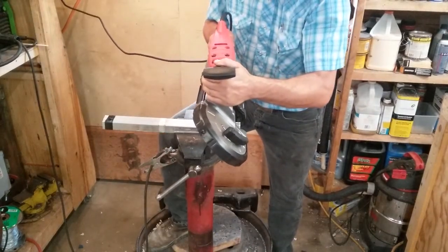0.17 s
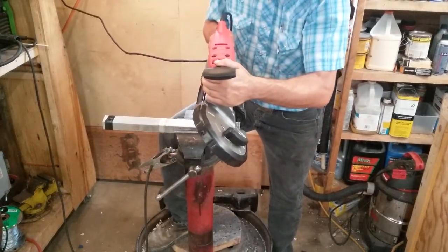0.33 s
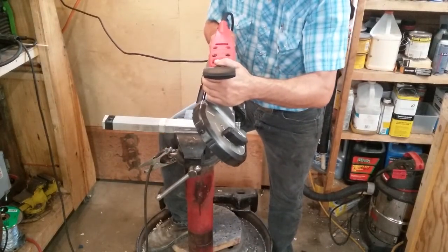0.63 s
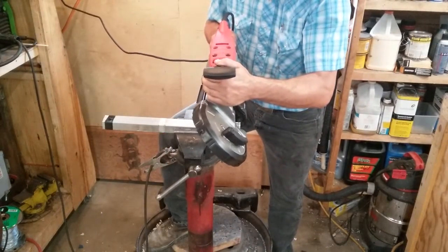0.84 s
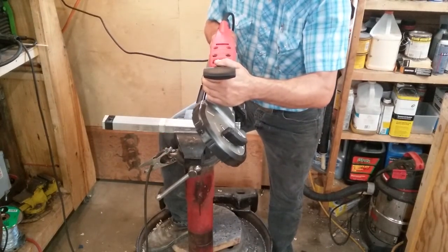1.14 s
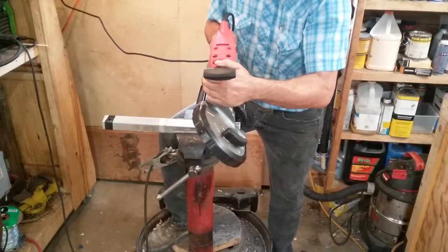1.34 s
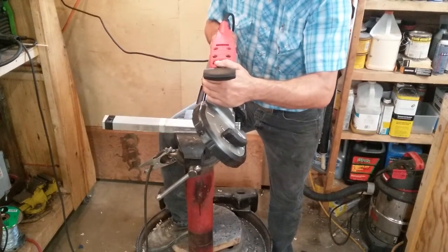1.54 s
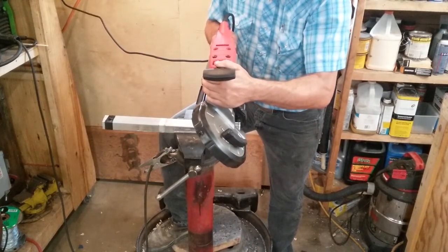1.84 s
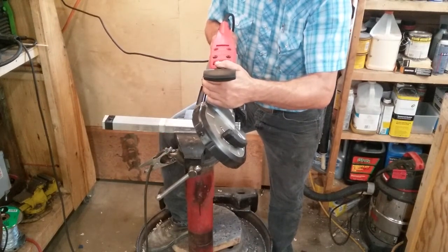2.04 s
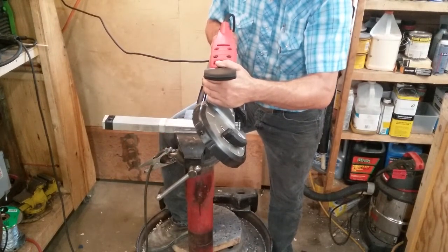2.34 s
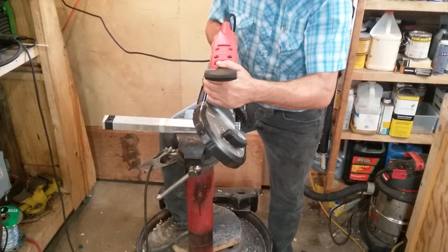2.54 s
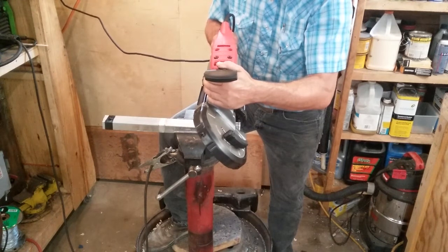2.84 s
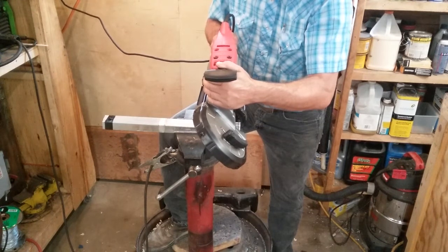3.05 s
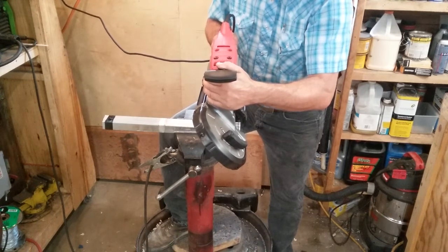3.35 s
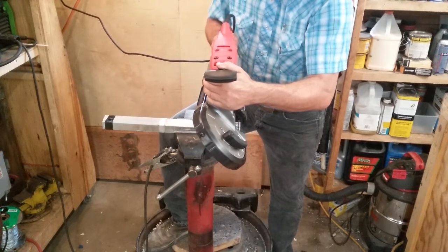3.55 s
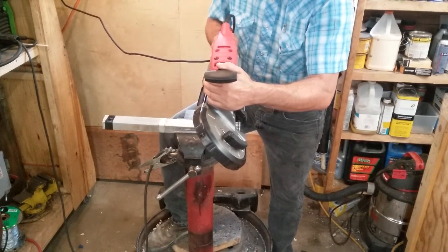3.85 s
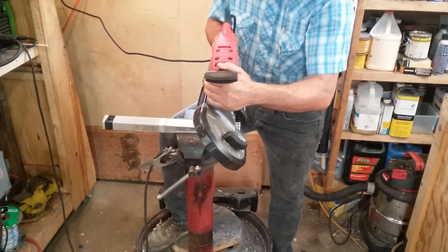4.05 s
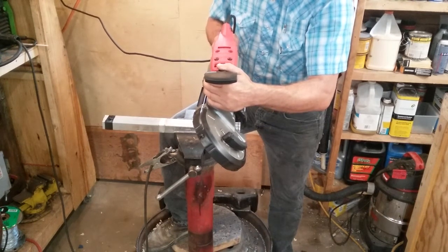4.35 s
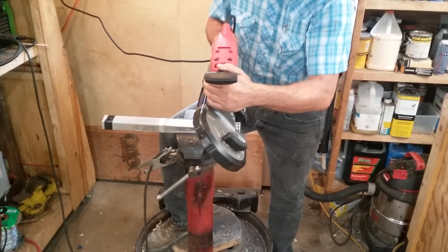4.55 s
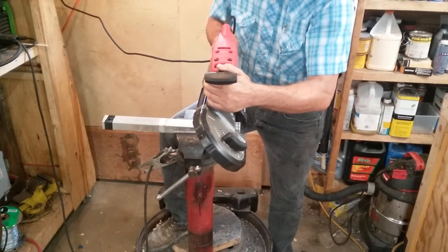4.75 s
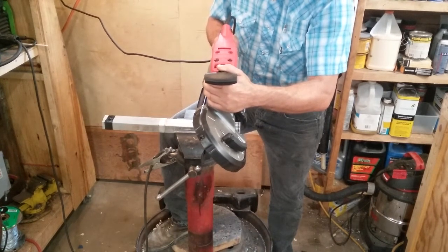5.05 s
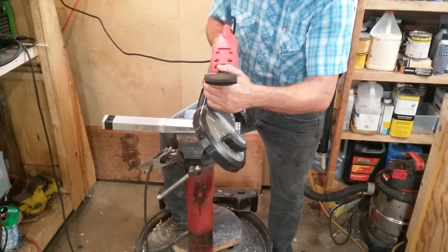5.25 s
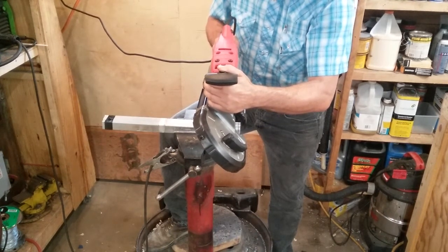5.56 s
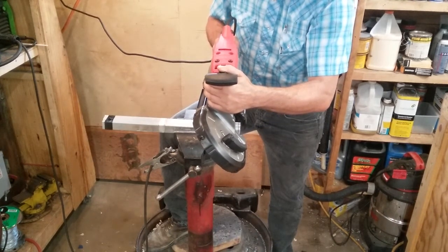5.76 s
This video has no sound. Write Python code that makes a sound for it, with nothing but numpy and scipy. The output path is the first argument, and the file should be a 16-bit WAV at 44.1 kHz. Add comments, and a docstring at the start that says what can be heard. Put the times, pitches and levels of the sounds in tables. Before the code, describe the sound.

An electric bandsaw whines and clatters freely, then slows as its blade screeches through sheet metal in a small shed.

```python
"""In a small wooden shed, a portable bandsaw runs free, then is pressed into a bundle of thin sheet metal.
At first its gears rattle over the whine of the motor and its fan. In the cut the motor slows and the
rattle dies down. The blade's teeth hammer out a rough, fluttering scream, and chips tear off with a
rasping hiss. A faint room rumble lies underneath."""
import sys
import numpy as np
from scipy import signal
from scipy.fft import rfft, irfft, next_fast_len
from scipy.io import wavfile
from scipy.ndimage import uniform_filter1d, minimum_filter1d

SR = 44100
rng = np.random.default_rng(int(sys.argv[2]) if len(sys.argv) > 2 else 0)


def unload_wav(signal):
    """Save mono or channel-first audio to the path in sys.argv[1] as 16-bit WAV at rate SR, clipped to [-1, 1]."""
    wavfile.write(
        sys.argv[1],
        SR,
        np.round(np.clip(np.atleast_2d(signal).T, -1, 1) * 32767).astype(np.int16),
    )


N = 259749
TIME = np.arange(N) / SR


def teeth(turns, sag, depth, screech_db):
    """Teeth hammer the sheets. Their spacing varies in a repeating pattern, which roughens the note."""
    # How hard the teeth bite. Each row: time in seconds, level in dB.
    bite = [(1.6, -22), (1.78, -22), (2.04, -13.5), (2.36, -16), (2.5, -13.5), (2.92, -18.5), (3.06, -25.5),
            (3.46, -15.5), (3.72, -24), (4.1, -19), (5.62, -18.5), (5.83, -17)]
    # Teeth snatch at a sheet's edge. Each row: middle in seconds, extra dB, half length in seconds.
    grabs = [(1.669, 8, 0.017), (1.744, 4, .01), (1.88, 3, .03), (2.0, 1, 0.0091), (2.22, 2.5, 0.011),
             (3.16, 4.5, .025), (3.275, 5, 0.012), (3.365, 6.5, 0.0074), (3.522, 2, 0.01), (3.61, 0, .009),
             (3.821, 7, 0.0085), (4.079, 6, 0.025), (4.359, 6.5, 0.012), (5.102, 4, 0.0079),
             (5.445, 3.5, 0.0057)]
    # Higher notes of the blows. Each row: multiple of the tooth rate, base level in dB,
    # extra dB per turn a second of sag, extra dB at full depth, share of a screech.
    overtones = [(2, -31.5, 0.155, 0.5, 1.3), (3, -32, 0.0846, 5, .45)]
    # How well the sheets give off sound. Each row: frequency in Hz, gain in dB.
    sheets = [(1800, 0), (2500, -10), (3080, 3), (3450, -4), (3850, 2.5), (4400, 9), (4700, -5.5),
              (5050, -1), (5400, -3.5)]
    teeth_per_turn, teeth_per_pattern = 5.283, 16
    passed = teeth_per_turn * turns
    spacing = (.11 - .04 * depth) * np.sin(2 * np.pi * passed / teeth_per_pattern)
    slip = .055 * drift(16)   # the blade stretches and slips by part of a tooth
    strikes = passed + spacing + slip
    flutter_hz = 22 + 4.1 * drift(2.92)   # deep in the cut, the blade flutters
    flutter_db = 4 * depth * np.sin(2 * np.pi * np.cumsum(flutter_hz) / SR)
    grab_db = swells(grabs)
    # Between grabs, the teeth lose their hold for moments.
    stutter_db = -7 * np.maximum(drift(38), 0) * np.exp(-np.abs(grab_db))
    blur = .22 * (1 - .75 * depth)   # the narrow cut guides the blade and cleans its note
    strength = from_db(in_time(bite) + grab_db + flutter_db + stutter_db)
    blows = strength * tone(strikes, blur, blur_hz=45)
    for multiple, base_db, db_per_sag, deep_db, screech_share in overtones:
        level_db = base_db + db_per_sag * sag + deep_db * depth + screech_share * screech_db
        waver_db = .6 * flutter_db + 1.2 * drift(25)
        blows += from_db(level_db + waver_db) * tone(round(multiple) * strikes, blur=.33, blur_hz=100)
    hz, spectrum = spectrum_of(blows)
    return signal_of(spectrum * from_db(at_hz(sheets, hz)))


def chips(load, depth, screech_db):
    """Tiny chips tear off and set the sheets rasping; the blade hisses in its guides and in the cut."""
    # Tone colours of the rasp and the hiss. Each row: frequency in Hz, level in dB.
    rasp_colour = [(60, -53), (250, -51.5), (600, -18), (1000, -10), (1350, 2.5), (1650, 3.5), (2000, 1),
                   (2450, -4), (3050, 5), (3550, 0.5), (4000, 5), (4400, -1), (4950, 2.5), (5600, -14.5),
                   (7000, -18), (11000, -41)]
    hiss_colour = [(100, -40), (3000, -3.5), (5300, 3), (6400, 4.5), (7000, -1), (8300, 0.5), (10000, -3.5),
                   (11500, -10), (16000, -10.5)]
    uneven = drift(13)
    rasp_db = -20.5 + 2.8 * depth + 1.44 * uneven
    hiss_db = -30.5 - 3 * load + 5 * depth + .38 * load * screech_db + .77 * uneven
    rasp = np.sqrt(load) * from_db(rasp_db) * radiate(impacts(per_s=16000), rasp_colour)
    hiss = from_db(hiss_db) * radiate(impacts(per_s=26000), hiss_colour)
    return rasp + hiss


def gears(turns, load):
    """Loose gears clatter in step with the shaft; the load presses them together and quiets them."""
    # Tone colour of the rattle. Each row: frequency in Hz, level in dB.
    rattle_colour = [(60, -61), (200, -40.5), (300, -34.5), (450, -23), (580, -13.5), (900, -8.5),
                     (1300, 2), (2400, 0.5), (3050, 2), (3500, -2), (4100, 0), (5000, -5), (7000, -17),
                     (15000, -37.5)]
    pulsing = 1 + .13 * (1 - load) * np.sin(2 * np.pi * turns / 3)
    clatter = impacts(per_s=30000) * pulsing
    return from_db(-14 - 11.17 * load + .51 * drift(11)) * radiate(clatter, rattle_colour)


def motor(speed, turns, load):
    """The off-balance shaft, the fan and the rotor's slots sing at multiples of the motor's speed."""
    # The motor's notes. Each row: multiple of the speed, base dB running free, base dB under load.
    whine = [(1, -53, -71.5), (2, -51.5, -61.5), (3, -24, -45.5), (5, -30, -28), (9, -31.5, -34),
             (12, -32.5, -35.5)]
    # The slots' whistle as heard through the housing. Each row: frequency in Hz, level in dB.
    housing = [(5260, -31), (5400, -35.5), (5470, -42), (5600, -33), (5690, -38.5), (5820, -31.5),
               (6000, -31.5), (6200, -35), (6600, -40)]
    slots = 18
    unsteady = turns + .0073 * drift(7.9)
    sound = from_db(at_hz(housing, slots * speed)) * tone(slots * unsteady, blur=.46, blur_hz=45)
    for multiple, free_db, loaded_db in whine:
        multiple = round(multiple)
        # A note swells as it glides through a resonance, more than noise would.
        lift_db = 1.37 * np.interp(TIME, TIME[::100], resonance_db(multiple * speed[::100]))
        level_db = free_db + (loaded_db - free_db) * np.sqrt(load) + lift_db
        sound += from_db(level_db) * tone(multiple * unsteady, blur=.15, blur_hz=13)
    return sound


def room_rumble():
    """A faint, uneven rumble fills the shed."""
    # Tone colour of the rumble. Each row: frequency in Hz, level in dB.
    rumble_colour = [(20, 15), (60, -10), (115, 5), (220, 6.5), (400, -9)]
    return from_db(-63.5 + 2.9 * drift(6)) * radiate(rng.standard_normal((2, N)), rumble_colour)


def resonance_db(hz):
    """The saw, its stand and the shed boost the frequencies at which they like to ring."""
    # Their resonances. Each row: centre in Hz, width in Hz, boost in dB.
    body = [(299.5, 42, 7), (321.2, 12.7, 8), (399, 35, 6), (506, 24, 8), (583, 19.7, 11.5), (612, 25, 7.5),
            (687.3, 21, 10), (721, 37, 5), (794, 27, 2), (821.5, 30, 9.5), (927, 17, 6), (979.5, 27, 9.5),
            (1244, 13, 3.5), (1274, 8.3, 3.5)]
    return sum(db / (1 + (2 * (hz - centre) / width) ** 4) for centre, width, db in body)


def stereo(paths):
    """Two sound paths add on the left and subtract on the right; each side has its own tone colour."""
    # How alike the sides are. Each row: frequency in Hz, likeness from -1 (opposite) to 1 (the same).
    likeness = [(100, 0.7), (350, 1), (700, .75), (1050, 0.6), (1350, 0.2), (1650, 0), (2000, -0.4),
                (2600, 0.29), (3080, 0.6), (3500, 0.1), (4100, -0.04), (5000, 0.05), (8000, -0.06)]
    # Which side is louder. Each row: frequency in Hz, left minus right in dB.
    balance = [(100, 2), (380, 1), (700, 1.5), (1300, 7), (1700, 4.5), (2500, 3), (3100, 5.5), (3500, 3.5),
               (3950, 5.5), (4850, -2), (6000, 4), (8000, -0.5), (11000, -7), (15000, -12.5)]
    hz, (common, opposed) = spectrum_of(paths)
    alike = np.clip(at_hz(likeness, hz), -.98, .98)
    sides = np.array([[1], [-1]])
    gains = from_db(sides * at_hz(balance, hz) / 2)
    gains = gains / np.sqrt(np.sum(gains ** 2, axis=0))
    return signal_of(gains * (np.sqrt(1 + alike) * common + sides * np.sqrt(1 - alike) * opposed))


def tone(cycles, blur, blur_hz):
    """A note on two paths a quarter cycle apart; blur is the share smeared by echoes off the walls."""
    echoes = np.array([rms_one(drift(blur_hz) + 1j * drift(blur_hz)) for path in range(2)])
    paths = np.sqrt(1 - blur) * np.array([[1], [1j]]) + np.sqrt(blur) * echoes
    return np.sqrt(2) * np.real(paths * np.exp(2j * np.pi * cycles))


def impacts(per_s):
    """Small random blows, arriving by two unrelated paths."""
    return rng.standard_normal((2, N)) * (rng.random(N) < per_s / SR)


def radiate(force, colour):
    """Give a force its tone colour and the resonances, at an average power of 1."""
    hz, spectrum = spectrum_of(force)
    return rms_one(signal_of(spectrum * from_db(at_hz(colour, hz) + resonance_db(hz))))


def drift(rate_hz):
    """A smooth random wander, about 1 in size."""
    pole = np.exp(-40 * np.pi * rate_hz / SR)
    noise = rng.standard_normal(N // 20 + 2002)   # one value per 20 samples, plus a run-up
    slow = signal.lfilter([1], [1, -2 * pole, pole * pole], noise)[2000:]
    return np.interp(np.arange(N) / 20, np.arange(len(slow)), rms_one(slow))


def swells(rows):
    """Short, bell-shaped rises in level, in dB."""
    return sum(db * np.exp(-.5 * ((TIME - middle_s) / width_s) ** 2) for middle_s, db, width_s in rows)


def ramp(start_s, length_s):
    """Rise from 0 to 1 and stay there."""
    return np.clip((TIME - start_s) / length_s, 0, 1)


def in_time(rows):
    """Read a curve at every sample."""
    return np.interp(TIME, *np.transpose(rows))


def at_hz(rows, hz):
    """Read a curve at given frequencies, with octaves evenly spaced."""
    row_hz, values = np.transpose(rows)
    return np.interp(np.log(hz), np.log(row_hz), values)


def spectrum_of(x):
    """Split a sound into its frequencies and their amounts."""
    size = next_fast_len(N, True)
    return np.maximum(np.fft.rfftfreq(size, 1 / SR), 1), rfft(x, size)


def signal_of(spectrum):
    """Turn a spectrum back into sound."""
    return irfft(spectrum, next_fast_len(N, True))[..., :N]


def from_db(db):
    """Turn decibels into a gain."""
    return 10 ** (np.asarray(db) / 20)


def rms_one(x):
    """Scale to an average power of 1."""
    return x / np.sqrt(np.mean(np.abs(x) ** 2) + 1e-20)


def scene():
    """One shaft drives the whole saw; the more it slows, the heavier the load."""
    # The motor's speed. Each row: time in seconds, turns a second.
    rotor = [(0, 361.7), (1.35, 366.6), (1.62, 364), (1.9, 351), (2.14, 334), (2.29, 329.4), (2.42, 333.6),
             (2.58, 331), (2.7, 325.6), (2.97, 322.5), (3.14, 324.5), (3.41, 310), (3.58, 311.6),
             (3.76, 316.6), (4, 314), (4.17, 305.7), (4.37, 308.3), (4.78, 299.8), (5.55, 301), (5.89, 293)]
    # The sheets screech an octave up. Each row: middle in seconds, base swell in dB,
    # half length in seconds.
    screeches = [(1.71, 6.5, 0.078), (1.96, 8, .03), (2.14, 7, .025), (2.62, 7, 0.033), (2.83, 6.5, 0.02),
                 (2.91, 9, 0.013), (3.135, 9, 0.028), (3.37, 3.5, 0.014), (4.08, 5.5, .012),
                 (4.48, 5.5, .01), (5.79, 2, 0.0098), (5.865, 4, 0.008)]
    free_speed, full_load_sag = 363.3, 23   # turns a second
    speed = in_time(rotor)
    turns = np.cumsum(speed) / SR
    touching = ramp(start_s=1.53, length_s=.06)   # the blade meets the metal
    depth = ramp(start_s=3.76, length_s=1.66)   # it sinks into its own cut
    sag = touching * np.maximum(free_speed - speed, 0)   # speed lost to cutting
    load = np.minimum(sag / full_load_sag, 1)
    screech_db = swells(screeches)
    saw = motor(speed, turns, load) + gears(turns, load) + chips(load, depth, screech_db)
    rumble = room_rumble()
    scream = touching * stereo(teeth(turns, sag, depth, screech_db))
    lean_db = 1.6 - 3 * depth   # the scream shifts to the right as the blade sinks in
    return stereo(saw + rumble) + scream * from_db(lean_db * np.array([[.35], [-.65]]))


def record(dry):
    """A fast limiter turns down the loudest peaks, and the highest treble is cut off steeply."""
    ceiling, cutoff_hz = .9, 15950
    needed_gain = 1 / np.maximum(np.abs(dry).max(axis=0) / ceiling, 1)
    smooth_gain = uniform_filter1d(minimum_filter1d(needed_gain, size=301), size=301)
    hz, spectrum = spectrum_of(dry * smooth_gain)
    return signal_of(spectrum * np.clip((cutoff_hz - hz) / 100 + .5, 0, 1))


dry = scene()
out = record(dry)
unload_wav(out)
```